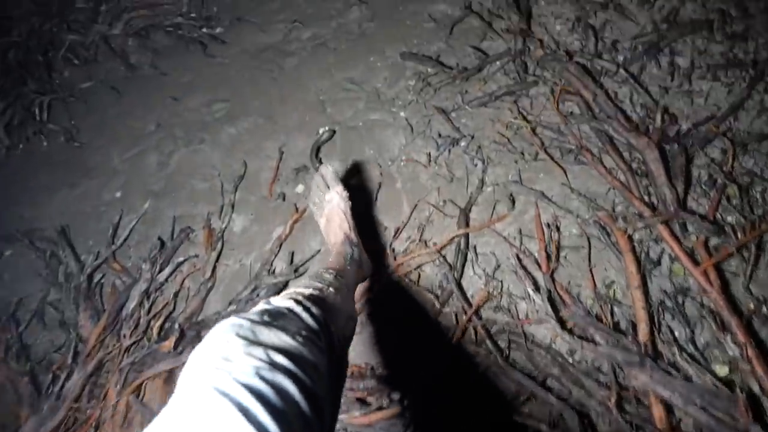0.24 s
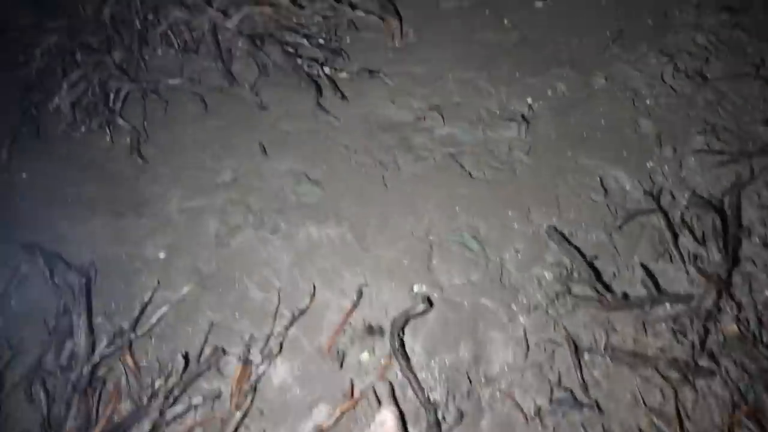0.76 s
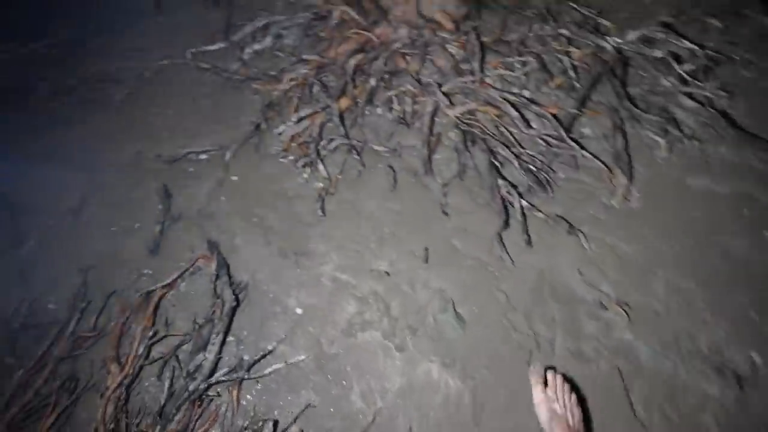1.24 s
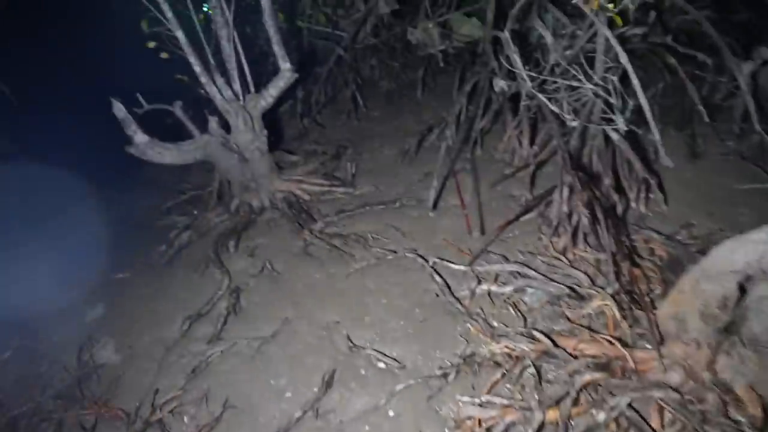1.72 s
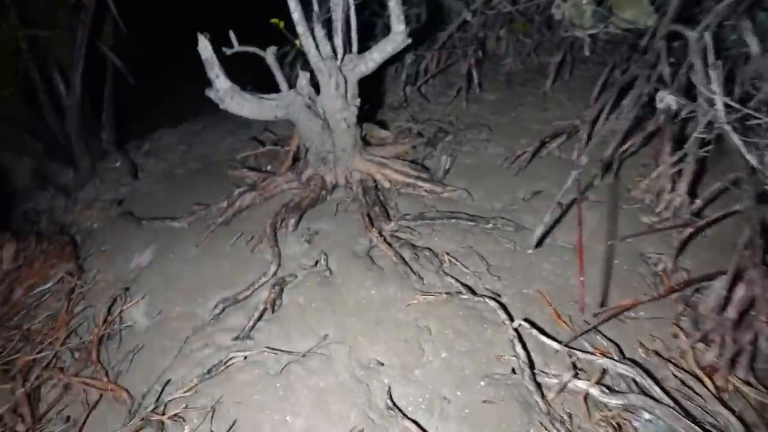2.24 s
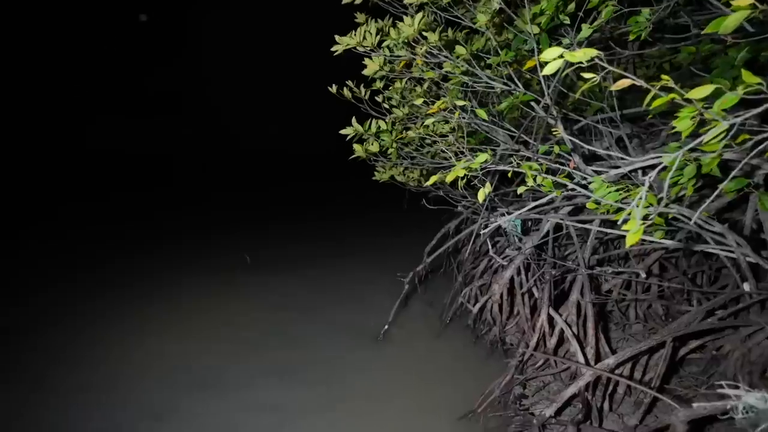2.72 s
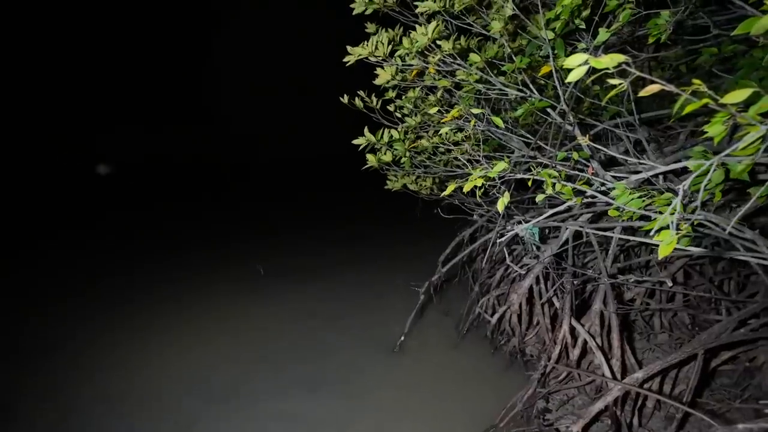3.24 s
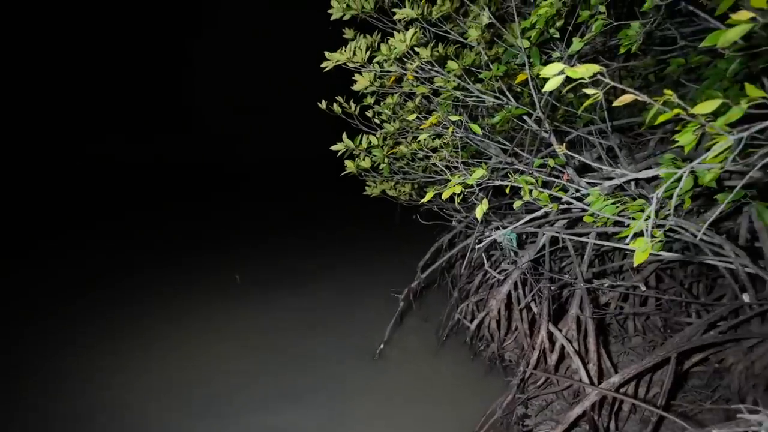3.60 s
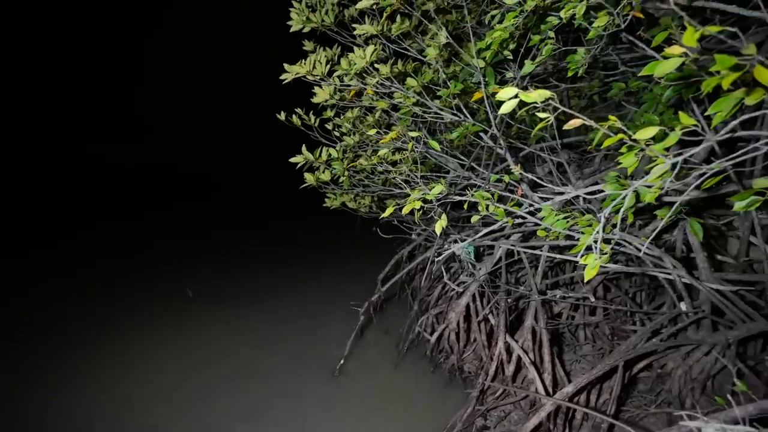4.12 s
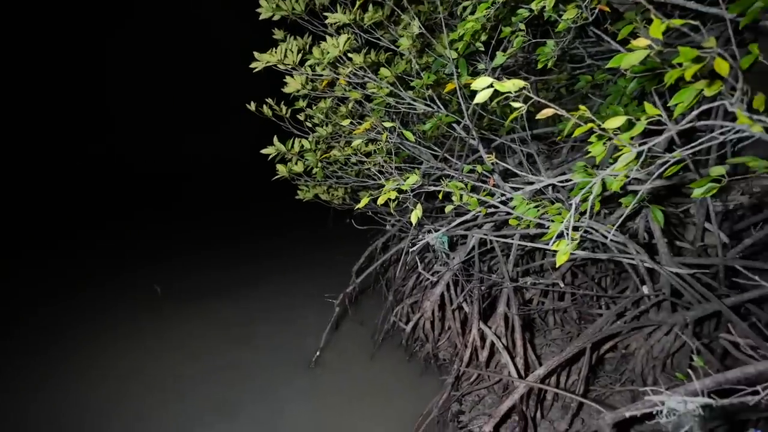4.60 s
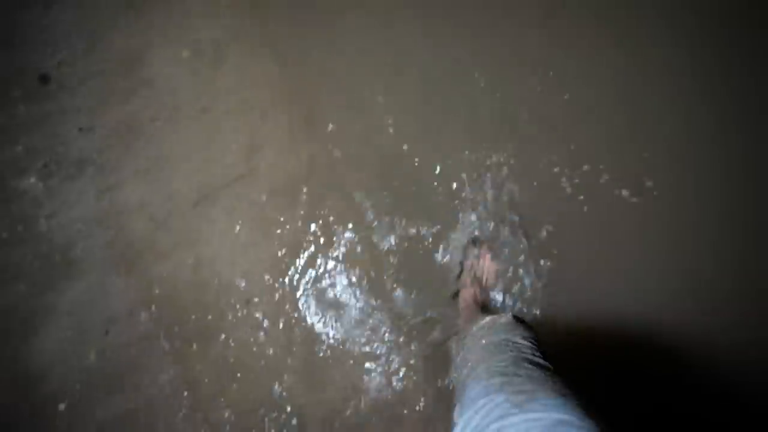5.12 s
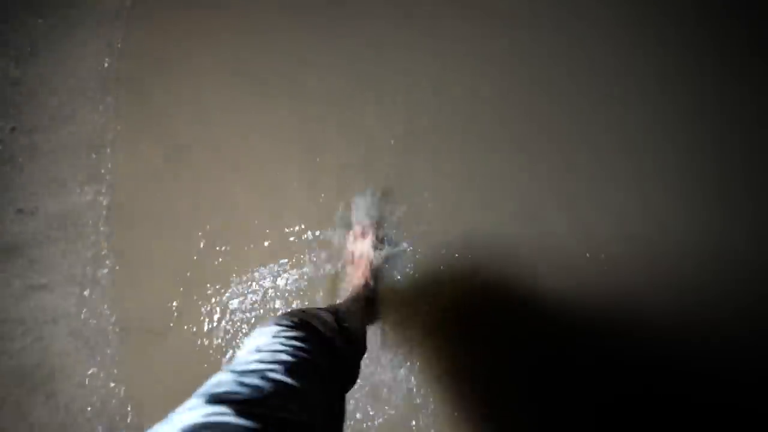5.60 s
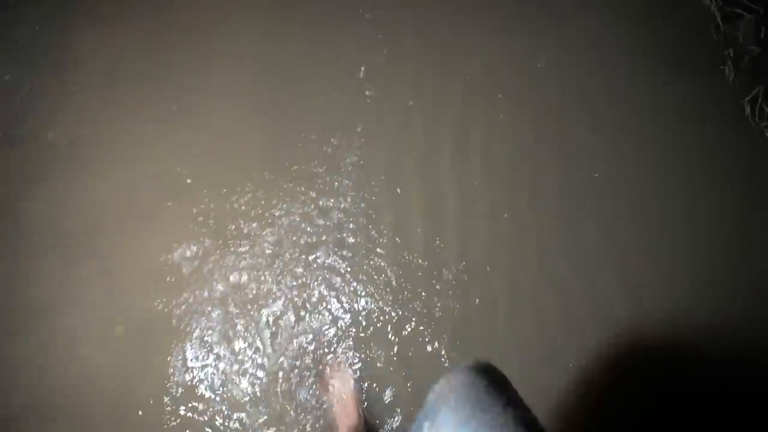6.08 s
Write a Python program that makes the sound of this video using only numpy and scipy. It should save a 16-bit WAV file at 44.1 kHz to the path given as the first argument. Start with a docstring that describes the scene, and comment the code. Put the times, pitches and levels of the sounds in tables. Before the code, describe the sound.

A quiet open-air night on a mangrove mudbank, heard through a swaying hand-held microphone with slow low rumbles. From 0 to 2.6 seconds bare feet press softly into mud: dull treads, small squelches and wet clicks, busiest in the first half second and again from 1.4 to 2.4, with light trouser brushing. A cricket chirps steadily about five times a second, nearing around 1.7, over very high rasping katydids, faint distant crickets, a weak rattling insect and low far engine hum. At 2.7 the cricket becomes clearer and closer while the walker nearly stands still; katydids swell from 3.2 to 5, with a few muddy pops near 4.8 to 5. At 5.1 the insects vanish abruptly. Loud wading follows: a sharp cluster of slaps and plops around 5.2, further splashes near 5.6, 5.9 and 6.3, with bubbling, gurgles and fizzing spray between.

```python
"""Night in a mangrove: bare feet tread softly through mud and roots, built from noise and ringing air pockets.
Trouser legs brush (short noise bursts), a near cricket chirps five times a second (pure tones), and katydids,
a far chorus, a rattling insect and a distant engine (narrow bands of noise or tone) sound around it.
At 5.1 s the night sounds stop at once and wading begins: swarms of bubbles, plops, slaps and hissing spray.
Throughout, the swaying hand-held microphone adds slow swings of pressure and a faint rumble."""
import sys
import numpy as np
from scipy import signal
from scipy.fft import rfft, irfft, next_fast_len
from scipy.io import wavfile
from scipy.ndimage import map_coordinates

SR = 44100
rng = np.random.default_rng(int(sys.argv[2]) if len(sys.argv) > 2 else 0)


def wrap_up_sound(samples):
    """Save the sound to the file named by the first command line argument, as 16-bit audio."""
    columns = np.atleast_2d(samples).T
    # keep every value between -1 and 1, then stretch to whole-number steps
    tamed = np.clip(columns, -1, 1)
    steps = np.round(tamed * 32767).astype(np.int16)
    wavfile.write(sys.argv[1], SR, steps)


N = 280035
T = np.arange(N) / SR  # time of each sample [s]
WADE_S = 5.118  # the wading begins

# footfalls and shifts of weight:
# (start [s], rise [s], hold [s], low tread level [dB], shuffle level [dB])
FOOTFALLS = [(0, 0.0067, 0.077, -48, -42.5), (.17, 0.027, 0.04, -43, -47.5), (.34, .04, 0.15, -49.5, -55),
             (.65, 0.027, 0.31, -56, -51), (1.05, .45, .05, -49.5, -43.5), (1.6, 0.076, 0.41, -53.5, -47.5),
             (2.38, 0.033, 0.2, -54.5, -54), (2.95, 0.24, 0.27, -72, -49), (3.7, .3, .1, -55, -57),
             (4.72, 0.054, 0.44, -65.5, -48)]
FOOT_RELEASE_DB_PER_S = 54


def amp(db):
    """Turn decibels into a gain."""
    return 10 ** (np.asarray(db) / 20)


def unit(x):
    """Scale a sound to an rms (average strength) of 1."""
    return x / np.sqrt(np.mean(x ** 2) + 1e-20)


def noise(size=N):
    """White noise: all pitches equally strong."""
    return rng.standard_normal(size)


def wobble(rate):
    """A smooth random curve through `rate` random points a second."""
    return map_coordinates(noise(size=int(N * rate / SR) + 4), [T * rate])


def filtered(x, response):
    """Multiply the spectrum of x by a response that depends on frequency."""
    padded = next_fast_len(len(x) + 8192)  # room for the filter to ring out
    spectrum = rfft(x, padded) * response(np.fft.rfftfreq(padded, 1 / SR))
    return irfft(spectrum, padded)[:len(x)]


def coloured(x, points):
    """Shape x with a curve of (frequency [Hz], relative level [dB]) points, at rms 1."""
    f, db = np.transpose(points)
    return unit(filtered(x, lambda hz: amp(np.interp(np.log(hz + 1), np.log(f), db))))


def resonance(x, centre_hz, width_hz, order=1):
    """Let x ring a resonance, applied `order` times to make it steeper, at rms 1."""
    def response(f):
        damping = 1j * f * width_hz
        return (damping / (centre_hz ** 2 - f * f + damping)) ** order

    return unit(filtered(x, response))


def add(track, s, sound):
    """Mix a sound into the track at time s."""
    part = track[max(0, round(s * SR)):][:len(sound)]
    part += sound[:len(part)]


def envelope(start, rise, hold, fade_db_per_s):
    """A gain that rises, holds and fades away."""
    age = T - start
    return np.clip(age / rise, 0, 1) * amp(-fade_db_per_s * np.maximum(age - rise - hold, 0))


def swells(rows, fade_db_per_s, rest_db):
    """A gain with (start, rise, hold, dB) swells over a resting level; their powers add."""
    power = sum((amp(db) * envelope(s, rise, hold, fade_db_per_s)) ** 2 for s, rise, hold, db in rows)
    return np.sqrt(power + amp(rest_db) ** 2)


def layer(rows, index):
    """Pick one level column, giving (start, rise, hold, dB) rows for swells."""
    return [(s, rise, hold, levels[index]) for s, rise, hold, *levels in rows]


def pulses(phase, width):
    """A smooth bump at every whole number of the phase."""
    return np.exp(-.5 * (((phase + .5) % 1 - .5) / width) ** 2)


def bubble(t, hz, t60, rise):
    """A pocket of air rings, dying by 60 dB in t60 seconds; its pitch climbs as it nears the surface."""
    life = np.minimum(t / t60, 2)
    ring = np.sin(2 * np.pi * hz * t * (1 + rise * (life - .5)))
    return ring * amp(-60 * life) * (1 - np.exp(-2 * hz * t))


def bubbles(per_s, low_hz, high_hz, cycles, spread_db):
    """A swarm of small bubbles; a few stand out as stronger, or as weaker if spread_db is negative."""
    count = int(per_s * (N / SR - WADE_S))
    when, pitch, life, size = rng.random((count, 4)).T[:, :, None]
    hz = low_hz * (high_hz / low_hz) ** pitch
    t = np.arange(1200) / SR
    t60 = np.minimum(cycles * 2 ** (2 * life - 1) / hz, t[-1])
    strength = amp(-spread_db * np.log(1 - .97 * size))
    rings = strength * np.sqrt(hz / t60) * bubble(t, hz, t60, rise=0.092)
    start = (SR * WADE_S + when * (N - SR * WADE_S)).astype(int)
    # add every bubble's samples into one track
    return np.bincount((start + np.arange(len(t))).ravel(), rings.ravel(), N)[:N]


def glide(length, first_hz, last_hz, width_hz):
    """A tone with a randomly shaky pitch that swells, slides and fades."""
    size = int(length * SR)
    drift = map_coordinates(noise(size=1024), [T[:size] * width_hz])
    hz = np.linspace(first_hz, last_hz, size) + width_hz * drift
    return signal.windows.tukey(size, .7) * np.sin(2 * np.pi * np.cumsum(hz) / SR)


def night():
    """Noise makes night air, stirred by each shuffle, a far engine's resonant hum and a faint steady hiss."""
    # night air: (frequency [Hz], relative level [dB])
    air_spectrum = [(20, -0.5), (32, -3.5), (70, -1.5), (160, -3), (260, -10.5), (450, -14), (1000, -15.5),
                    (2000, -22.5), (3000, -24.5), (4000, -30.5), (6000, -37), (12000, -48)]
    # far engine before the walker reaches the bank: (frequency [Hz], width [Hz], level [dB])
    drone_inland = [(57.7, 1.07, -51), (85.4, 3, -57), (119.45, 11, -52), (139.2, 5.8, -51.5)]
    # far engine once the walker is at the bank: (frequency [Hz], width [Hz], level [dB])
    drone_bank = [(54, 9.8, -56.5), (99.04, 5.1, -50), (123.7, 3.1, -59), (140.2, 30, -54),
                  (179.4, 13, -63)]
    bank_s, air_db = 2.66, -50.5  # the walker reaches the bank; level of still air

    def drone(lines):
        return sum(amp(db) * resonance(noise(), hz, width, order=2) for hz, width, db in lines)

    air_gain = swells(layer(FOOTFALLS, 1), FOOT_RELEASE_DB_PER_S, air_db)
    engine = np.where(T < bank_s, drone(drone_inland), drone(drone_bank))
    hiss = amp(-68) * coloured(noise(), [(2000, -2), (6000, -4), (11000, -3), (15500, -12)])
    return air_gain * coloured(noise(), air_spectrum) + engine + hiss


def sway():
    """The moving microphone feels slow swings of pressure and a faint rumble, stronger at each jolt."""
    # jolts from a step or a turn: (time of full strength [s], sway level [dB])
    jolts = [(.38, -26), (.6, -21), (.94, -19.5), (1.43, -20.5), (1.78, -23), (2.2, -21), (2.5, -22),
             (3.93, -30), (5.18, -18.5), (5.42, -22), (5.92, -25)]
    rise_s, hold_s, fade_db_per_s = 0.085, 0.057, 62
    steady_hand_db, rumble_db = -33.5, -29.5  # the rumble is relative to the sway
    rows = [(s - rise_s, rise_s, hold_s, db) for s, db in jolts]
    motion = swells(rows, fade_db_per_s, steady_hand_db)
    swing = np.sin(2 * np.pi * 11 * T + 1.04 * wobble(8.2))
    rumble = resonance(noise(), 31.5, 20, order=3)
    return motion * (unit(swing) + amp(rumble_db) * rumble)


def katydid(hz, rate, beat_s, waver, rasp):
    """Two strong wing strokes and a weak one per beat ring a narrow resonance; steady noise blurs them like echoes."""
    phase = (T - beat_s) * rate + .012 * wobble(3)
    strokes = pulses(phase, 0.078) + pulses(phase - .34, 0.079) + 0.29 * pulses(phase - .64, 0.045)
    tone = np.sin(2 * np.pi * hz * T + waver * wobble(130))
    ring = tone + rasp * resonance(noise(), hz, 460, order=2)
    echoes = amp(-11.0) * resonance(noise(), hz, 420, order=3)
    return resonance(strokes * ring + echoes, hz, 890, order=3)


def rattler():
    """Phrases of four short rasps, the last weak; each falls in pitch, over a noise that lingers like echoes."""
    phrase = (T - 3.95) % .182  # seconds into each phrase
    stroke = (phrase - .017) / .0355  # counts the rasps: 0, 1, 2, 3
    force = np.interp(stroke, [0, 2, 3, 3.5], [1, 1, .4, 0])
    # the upper band sounds a little before the lower one
    upper = pulses(stroke + .06, .1) * resonance(noise(), 5020, 620, order=3)
    lower = .8 * pulses(stroke - .1, .12) * resonance(noise(), 4720, 620, order=3)
    linger = np.interp(stroke, [-.5, 1, 2.5, 4], [.8, 1.5, 1.5, .8])
    band = [(3500, -40), (4300, -5.5), (4900, 0), (5250, -3.5), (5550, -36), (6500, -50)]
    return unit(unit(force * (upper + lower)) + linger * coloured(noise(), band))


def cricket():
    """Each chirp is a pure tone that leaps up, then sags in pitch; its echo from the trees keeps one level."""
    # the near cricket as the walker passes it and stops beside it: (time [s], level [dB], pitch [Hz])
    nearness = [(0.17, -58, 2573), (0.77, -58, 2560), (.96, -51, 2625), (1.15, -52.5, 2605),
                (1.74, -45, 2595), (2.14, -49, 2623), (2.52, -55.5, 2622), (2.66, -41.5, 2608),
                (5.05, -41.5, 2604)]
    # unbroken runs of chirps: (first chirp [s], end [s])
    chirp_runs = [(0.168, 2.6), (2.686, 5.1)]
    period_s, scatter_db, scatter_hz = .1968, .5, 4.8  # the scatter is from chirp to chirp
    direct, radiated, t = np.zeros(N), np.zeros(N), T[:SR // 10]
    swell_db = [-17, -6.0, 3.0, 1.5, 0, -19, -45]
    swell = amp(np.interp(t, [0, .007, .02, .042, .06, .075, .095], swell_db))
    sag_hz = np.interp(t, [0, .014, .03, .05, .07], [-34, 88.5, 22.5, -31.5, -73])
    when, level_db, pitch_hz = np.transpose(nearness)
    for s in np.concatenate([np.arange(first, end, period_s) for first, end in chirp_runs]):
        hz = np.interp(s, when, pitch_hz) + rng.normal(0, scatter_hz)
        db = np.interp(s, when, level_db) + rng.normal(0, scatter_db)
        chirp = swell * np.sin(2 * np.pi * np.cumsum(hz + sag_hz) / SR)
        add(direct, s, amp(db) * chirp)
        add(radiated, s, chirp)
    # fading noise smears the chirps into an echo
    tail = noise(size=SR // 2) * amp(-60 * T[:SR // 2] / .38)
    echo = signal.fftconvolve(radiated, tail / np.linalg.norm(tail))[:N]
    return direct + amp(-54) * echo


def insects():
    """Two katydids, a noise blur of far crickets, a rattling insect and the near cricket, each with its own swells."""
    # katydid phrases: (start [s], rise [s], hold [s], level [dB], singer [0 lower, 1 higher])
    phrases = [(0, 0.09, 0.043, -63, 0), (.36, 0.033, 0.77, -63.5, 0), (1.33, 0.17, 0.16, -53, 0),
               (1.7, 0.028, 0.41, -57.5, 0), (2.52, 0.022, 0.063, -53, 0), (4.198, 0.17, 0.55, -55, 0),
               (.38, .08, .3, -67.5, 1), (1.3, 0.35, 0.33, -64, 1), (2.45, 0.092, .08, -78, 1),
               (3.2, 0.65, .92, -56, 1)]
    # the lower singer stops short, the higher one trails off: one fade each [dB per s]
    phrase_fades = [152, 22]
    katydid_far_db = -70.5  # others of their kind, far away
    low_gain, high_gain = (
        swells([row for *row, who in phrases if round(who) == singer], fade, katydid_far_db)
        for singer, fade in enumerate(phrase_fades))
    # far crickets swell, then slowly ease; the rattling insect comes into earshot
    far_gain = swells([(1.1, 0.95, 0, -60.5)], fade_db_per_s=1.15, rest_db=-75)
    rattle_gain = swells([(1.2, 0.91, 0, -66.5)], fade_db_per_s=0, rest_db=-74.5)
    high = katydid(8605, rate=15.7, beat_s=3.913, waver=.7, rasp=.25)
    low = katydid(8372, rate=14.9, beat_s=4.295, waver=.45, rasp=.2)
    far = resonance(noise(), 3186, 190, order=2)
    return high_gain * high + low_gain * low + far_gain * far + rattle_gain * rattler() + cricket()


def mud_steps():
    """Soles press into mud as low noise, air pockets ring and smack, and cloth brushes as bursts of noise."""
    # sound of the tread: (frequency [Hz], relative level [dB])
    tread = [(90, -46), (180, 6.5), (290, 3), (450, -1), (800, -18), (2000, -41.5), (5000, -72)]
    # mud squelches and root knocks: (time [s], level [dB], pitch [Hz], time to die by 60 dB [s])
    squelches = [(.019, -42, 264, 0.12), (.214, -27, 600, 0.0085), (.247, -35, 430, 0.027),
                 (.298, -36.5, 770, 0.027), (.369, -28.5, 288, 0.038), (1.365, -24, 1310, 0.0035),
                 (1.516, -34.5, 290, 0.088), (1.639, -44.5, 2220, 0.038), (1.686, -36, 1210, 0.031),
                 (1.869, -42, 675, 0.12), (2.112, -32, 135, .05), (2.126, -32, 600, 0.0064),
                 (2.2273, -28.5, 700, 0.0035), (2.431, -36, 323, 0.034), (2.433, -30, 1630, 0.0097),
                 (3.032, -27.5, 850, 0.0026), (4.753, -40, 547, 0.064), (4.812, -37.5, 1500, 0.015),
                 (4.949, -35, 897, 0.059), (4.968, -37, 1310, .03), (5.007, -26.5, 1010, 0.012)]
    # cloth brushing: (start [s], length [s], level [dB], strongest frequency [Hz])
    brushes = [(0.0, 0.15, -62, 2000), (0.122, 0.1, -53.5, 3600), (0.193, 0.79, -59, 2550),
               (0.435, 0.076, -49.5, 5400), (0.491, 0.18, -56, 4500), (0.554, 0.18, -52, 4440),
               (0.703, 0.17, -61, 1900), (1.341, 0.05, -51, 4000), (1.359, 0.15, -55, 3900),
               (1.607, 0.1, -55.5, 1470), (1.878, 0.15, -64, 4300), (2.075, 0.11, -56.5, 3800),
               (4.728, 0.051, -58, 3000), (4.916, 0.11, -55, 3020)]
    standing_db = -55.5  # feet at rest in the mud
    weight = swells(layer(FOOTFALLS, 0), FOOT_RELEASE_DB_PER_S, standing_db)
    out = weight * amp(1.4 * wobble(30)) * coloured(noise(), tread)
    t = T[:SR // 8]
    for s, db, hz, t60 in squelches:
        smack = .42 * resonance(noise(size=len(t)), hz, 1.6 * hz, order=3) * amp(-60 * t / .022)
        add(out, s, amp(db) * (bubble(t, hz, t60, rise=0.073) + smack))
    for s, length, db, hz in brushes:
        size = int(length * SR)
        fibres = noise(size=size) * amp(2.5 * noise(size=size))  # uneven, grainy noise
        order = 2 if hz < 3500 else 1
        stroke = signal.windows.tukey(size, .6) * amp(np.linspace(2, -3, size))  # the contact eases off
        add(out, s, amp(db) * stroke * resonance(fibres, hz, hz, order=order))
    return out


def gurgles():
    """Pockets of air squeezed or opened by the foot ring with a sliding pitch."""
    # cavities in mud and water that change size while they ring:
    # (start [s], length [s], peak level [dB], first pitch [Hz], last pitch [Hz])
    cavities = [(0.043, 0.057, -38.5, 290, 233), (0.203, 0.068, -45, 335, 240),
                (2.519, 0.035, -47.5, 563, 695), (5.315, 0.034, -32, 1008, 1290),
                (5.716, 0.035, -39, 385, 640), (5.757, 0.035, -33.5, 716, 840),
                (5.817, 0.043, -29.5, 1417, 1292), (5.885, 0.025, -31, 550, 414),
                (5.942, 0.028, -28.5, 453, 650), (5.996, 0.048, -35, 783, 620)]
    out = np.zeros(N)
    for s, length, db, first_hz, last_hz in cavities:
        add(out, s, amp(db) * glide(length, first_hz, last_hz, width_hz=0.039 * first_hz))
    return out


def sliding_tones():
    """Three shaky tones together make each faint sliding sound."""
    # a blurred insect-like tone, a soft falling swish, and a rough squeak that rises, then falls:
    # (start [s], length [s], level of each tone [dB], first pitch [Hz], last pitch [Hz], width [Hz])
    slides = [(0.169, 0.42, -63, 2654, 2430, 183), (1.874, 0.3, -57, 4030, 3170, 257),
              (2.425, .065, -54, 1610, 2150, 109), (2.468, .11, -59, 2075, 1860, 110.6)]
    out = np.zeros(N)
    for s, length, db, first_hz, last_hz, width_hz in slides:
        add(out, s, amp(db) * sum(glide(length, first_hz, last_hz, width_hz) for _ in range(3)))
    return out


def wading():
    """Legs churn up swarms of ringing bubbles, from deep surge to fine spray, with hiss and a low swirl."""
    # the legs push through the water and it falls back:
    # (start [s], rise [s], hold [s], deep surge level [dB], slosh level [dB], spray level [dB])
    strokes = [(5.116, .008, 0.064, -37.5, -38, -35.5), (5.165, 0.017, 0.023, -48, -34, -38),
               (5.209, 0.0061, 0.027, -53, -32, -26), (5.26, .012, 0.026, -35.5, -42, -56),
               (5.34, 0.059, 0.024, -38.5, -45.5, -43.5), (5.45, 0.0095, 0.02, -42.5, -37.5, -40.5),
               (5.52, 0.025, 0.017, -46.5, -42, -54), (5.573, 0.0035, 0.037, -49, -33.5, -29),
               (5.66, 0.029, 0.042, -48.5, -41.5, -41), (5.775, 0.041, 0.038, -64, -34, -34.5),
               (5.855, 0.038, 0.031, -33.5, -32, -34), (5.97, 0.014, 0.031, -52, -45, -57),
               (6.17, 0.028, 0.089, -54, -44.5, -38), (6.29, .018, 0.018, -45, -39.5, -30.5)]
    # fading of surge, slosh and spray after each stroke [dB per s]
    settling = [135, 105, 121]
    # levels of surge, slosh and spray between strokes [dB]
    lapping = [-52, -45, -51]
    # sound of the deep surge: (frequency [Hz], relative level [dB])
    surge_spectrum = [(100, -18), (230, -10), (340, -2), (520, 3), (700, -5.5), (1000, -3), (2000, -33)]
    # sound of the slosh: (frequency [Hz], relative level [dB])
    slosh_spectrum = [(300, -37), (600, -1.5), (850, -1), (1200, 2), (1800, -3.5), (2600, -15), (4000, -7),
                      (10000, -47)]
    # sound of the spray: (frequency [Hz], relative level [dB])
    spray_spectrum = [(600, -22), (1800, -2.5), (3000, -2), (4200, -2.5), (5500, -8.5), (8000, -9.5),
                      (11000, -15.5), (15500, -16)]
    surge_gain, slosh_gain, spray_gain = (
        swells(layer(strokes, k), settle, lapping[k]) for k, settle in enumerate(settling))
    wet = T >= WADE_S

    def water(swarm, spectrum, hiss):
        rings = coloured(swarm, spectrum)
        return rings / np.std(rings[wet]) + hiss * coloured(noise(), spectrum)

    deep = bubbles(per_s=260, low_hz=286, high_hz=900, cycles=20, spread_db=-1.0)
    middle = bubbles(per_s=520, low_hz=650, high_hz=3200, cycles=22, spread_db=3.5)
    fine = bubbles(per_s=1900, low_hz=1800, high_hz=15000, cycles=10, spread_db=5)
    surge = water(deep, surge_spectrum, hiss=0.37)
    slosh = water(middle, slosh_spectrum, hiss=.28)
    spray = water(fine, spray_spectrum, hiss=.38)
    swirl_spectrum = [(25, 4.5), (60, -7), (120, -4.5), (300, -11.5), (1000, -46), (4000, -54)]
    swirl = amp(-47.5) * coloured(noise(), swirl_spectrum)
    return wet * (surge_gain * surge + slosh_gain * slosh + spray_gain * spray + swirl)


def splashes():
    """Cavities close with a ringing plop; sheets of water land with a slap of fast-fading noise."""
    # large bubbles and drops: (time [s], peak level [dB], pitch [Hz], time to die by 60 dB [s])
    plops = [(5.147, -19, 594, 0.012), (5.171, -18, 2160, 0.009), (5.178, -18, 2360, 0.015),
             (5.2, -18.5, 1870, 0.018), (5.213, -11.5, 1490, 0.0097), (5.216, -7, 4070, 0.0057),
             (5.238, -21, 1290, 0.018), (5.239, -15, 1150, 0.0057), (5.243, -9, 1280, 0.0095),
             (5.256, -11, 2770, 0.0027), (5.321, -19, 1133, 0.03), (5.375, -25, 1190, 0.019),
             (5.461, -28, 1300, 0.045), (5.468, -20.5, 3470, 0.011), (5.613, -15, 3150, 0.0079),
             (5.626, -24.5, 776, 0.03), (5.633, -24, 585, 0.048), (5.679, -19.5, 2900, 0.016),
             (5.766, -23.5, 1050, 0.026), (5.82, -26, 1020, 0.02), (5.846, -20, 2970, 0.007),
             (5.853, -23, 958, 0.037), (5.874, -26, 370, 0.032), (5.89, -20.5, 532, 0.048),
             (5.897, -20.5, 1100, 0.016), (5.91, -19, 1810, 0.013), (5.925, -16.5, 3380, 0.0097),
             (5.944, -23, 472, 0.044), (5.946, -16, 1010, 0.0032), (5.96, -19, 1990, 0.0056),
             (6.023, -25, 1200, 0.018), (6.294, -20, 3300, 0.0098), (6.212, -26.5, 590, 0.041),
             (6.328, -22, 675, 0.016)]
    # water slapping on water and skin: (time [s], peak level [dB], strongest frequency [Hz])
    slaps = [(5.121, -20.5, 2070), (5.1469, -14, 3720), (5.217, -12, 8000), (5.221, -7, 4860),
             (5.2397, -3.5, 2400), (5.2443, -14, 2600), (5.2494, -14, 4200), (5.2533, -13, 8000),
             (5.29, -27, 3980), (5.461, -22, 10000), (5.486, -19.5, 3980), (5.5769, -13, 3380),
             (5.615, -9, 4630), (5.827, -25, 4300), (5.889, -9.5, 3260), (5.894, -17.5, 5560),
             (5.960, -12.5, 3000), (5.975, -22.5, 4050), (6.181, -25, 1790), (6.2924, -15.5, 7700),
             (6.324, -17.5, 6000), (6.3272, -17, 1390)]
    out, t = np.zeros(N), T[:SR // 12]
    for s, db, hz, t60 in plops:
        ring = bubble(t, hz, t60, rise=0.063)
        add(out, s, amp(db) * ring / np.abs(ring).max())
    for s, db, hz in slaps:
        burst = noise(size=len(t)) * amp(-60 * t / .012)
        slap = resonance(burst, hz, 0.47 * hz)
        add(out, s, amp(db) * slap / np.abs(slap).max())
    return out


def scene():
    """The muddy bank, then the water; gurgles and microphone sway run through both."""
    bank = (T < WADE_S) * (night() + insects() + mud_steps() + sliding_tones())
    return (bank + wading() + splashes() + gurgles() + sway())[None]


def record(dry):
    """The recorder keeps nothing from its band limit upward."""
    top_hz = 15950
    return np.array([filtered(x, lambda hz: hz < top_hz) for x in dry])


dry = scene()
out = record(dry)
wrap_up_sound(out)
```